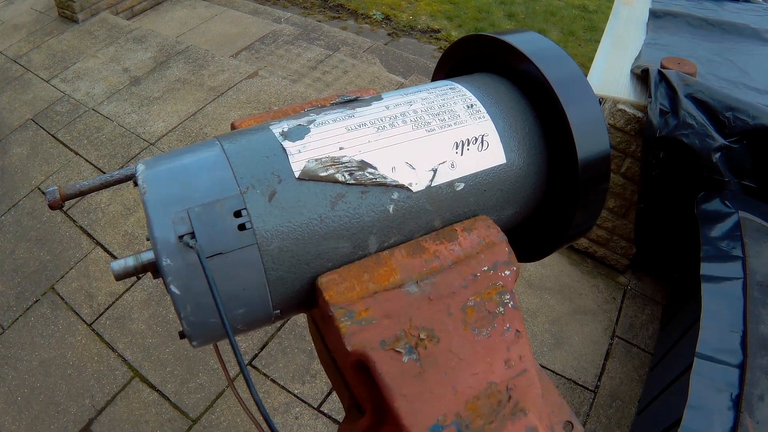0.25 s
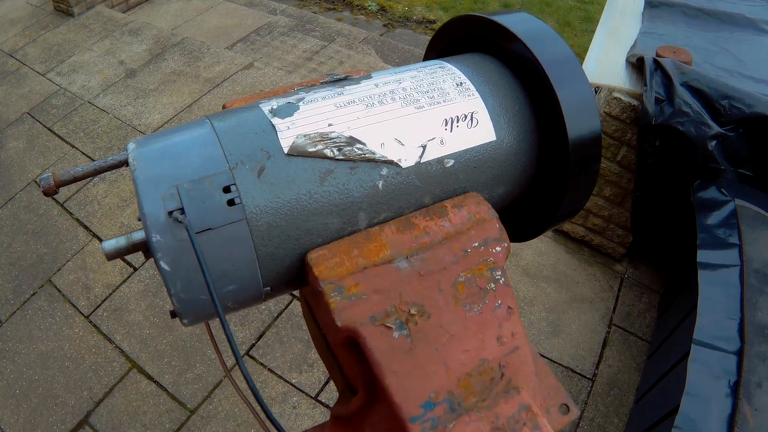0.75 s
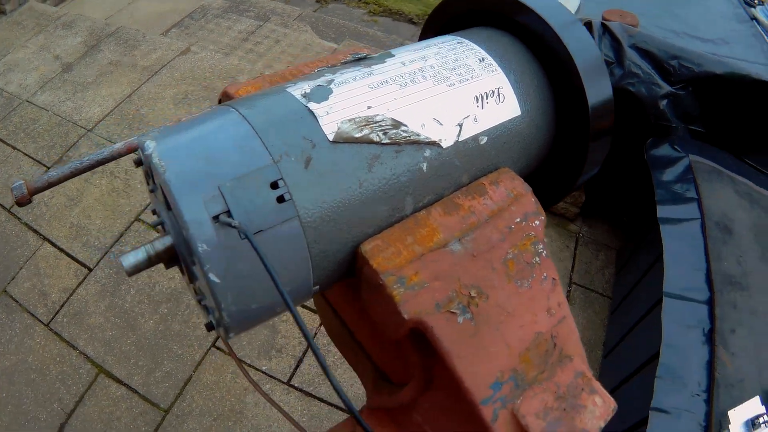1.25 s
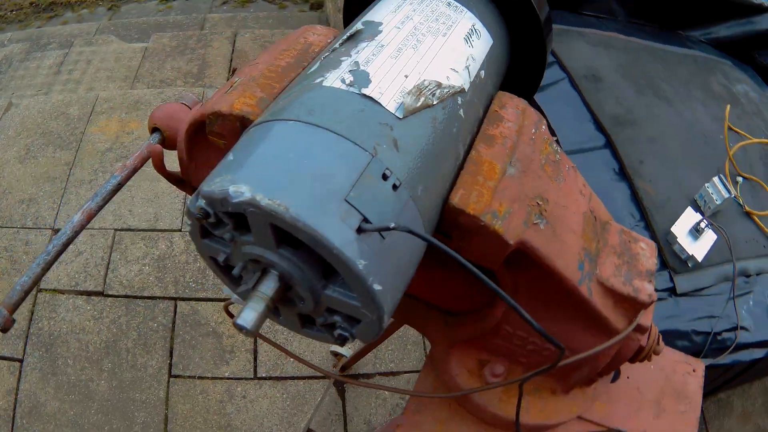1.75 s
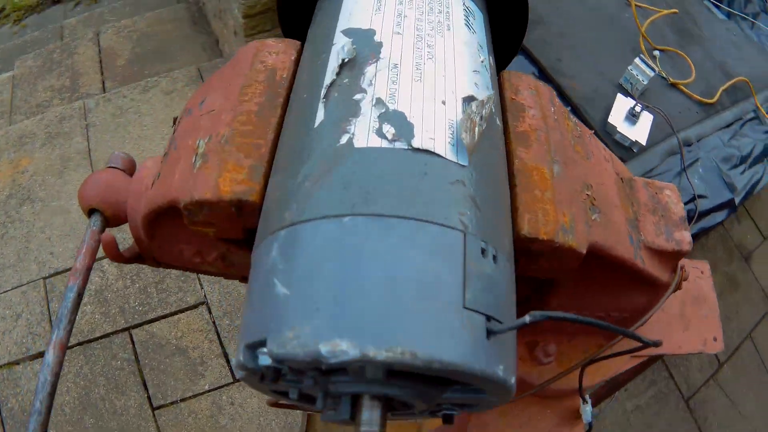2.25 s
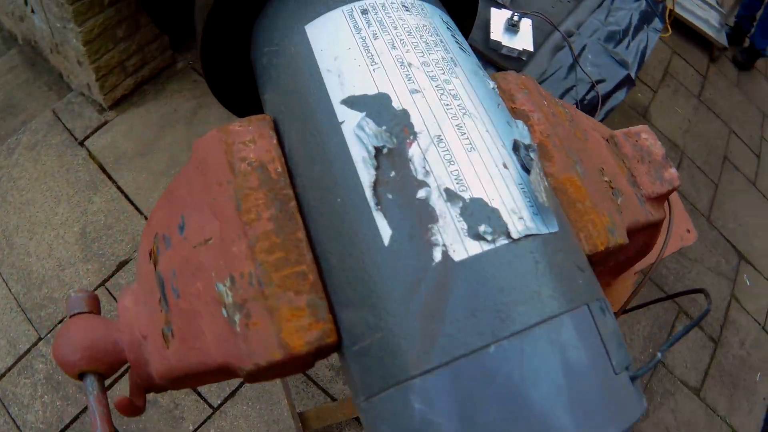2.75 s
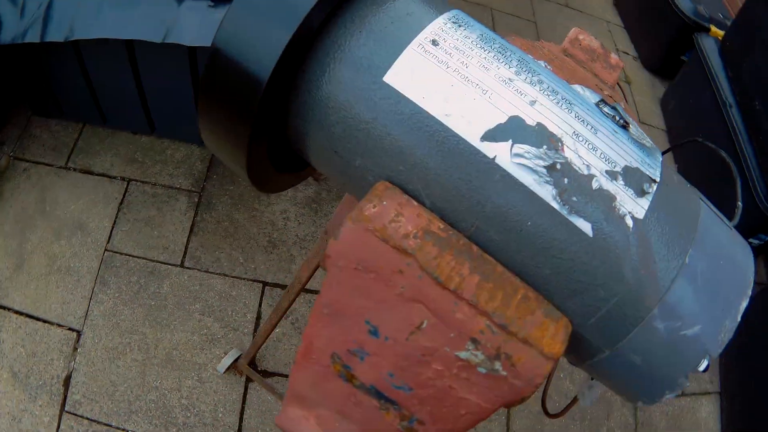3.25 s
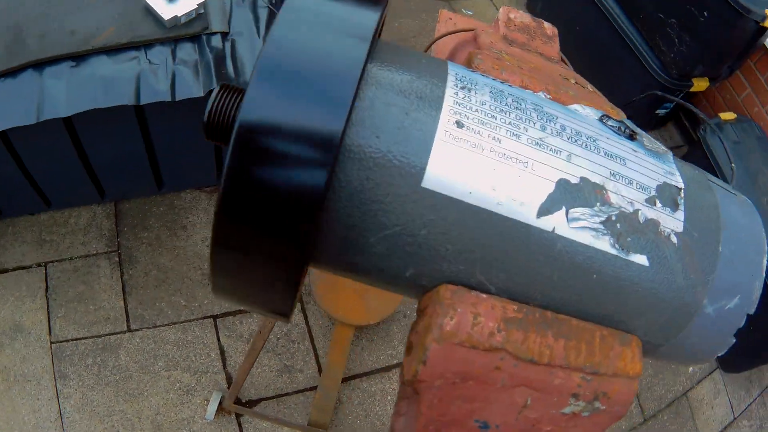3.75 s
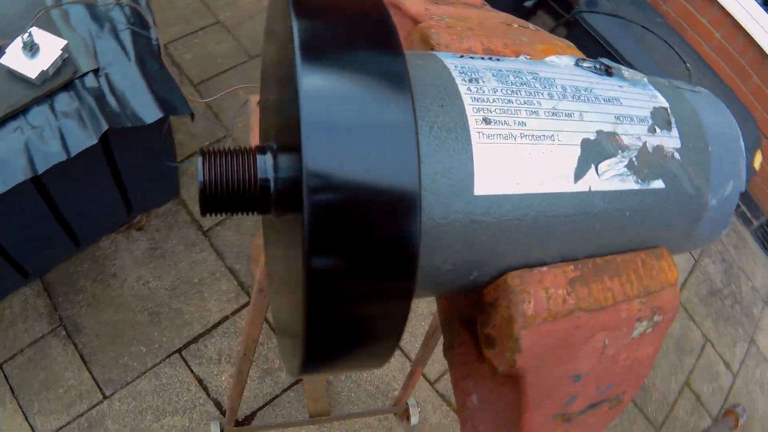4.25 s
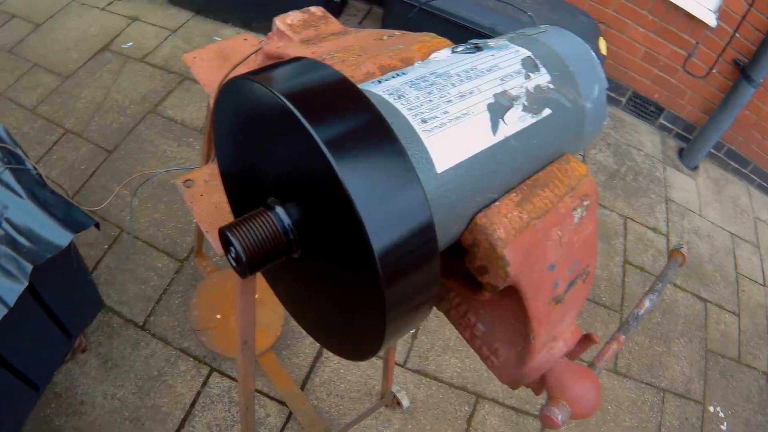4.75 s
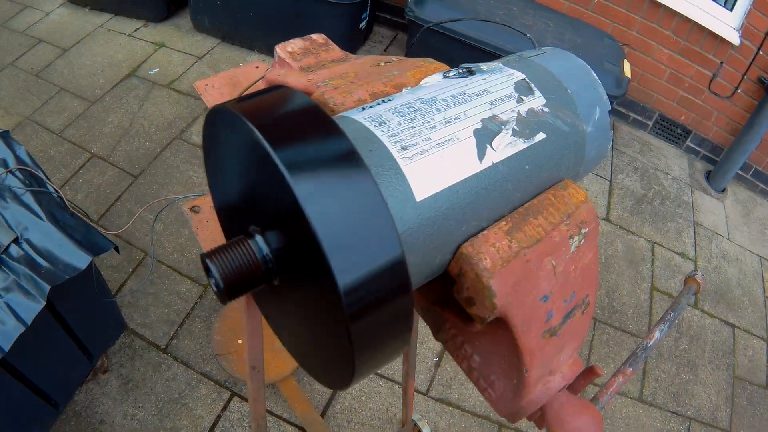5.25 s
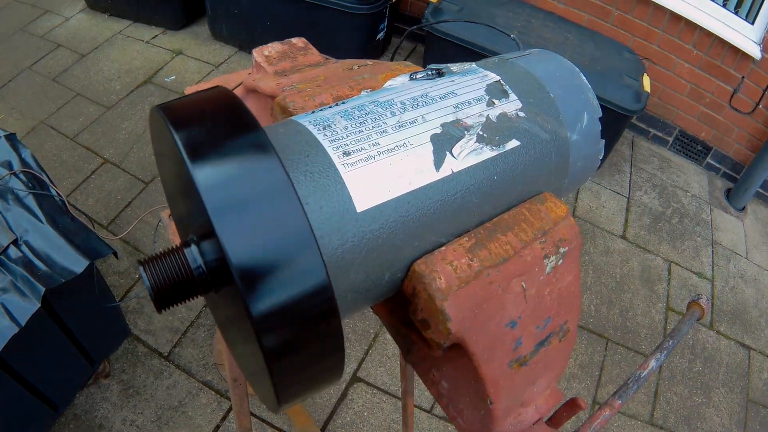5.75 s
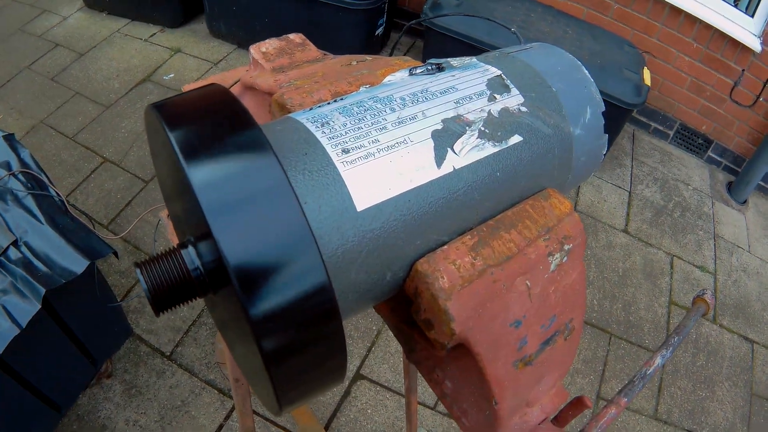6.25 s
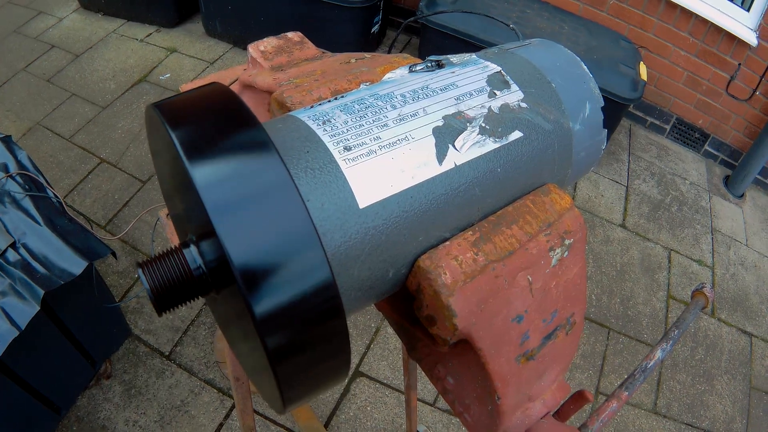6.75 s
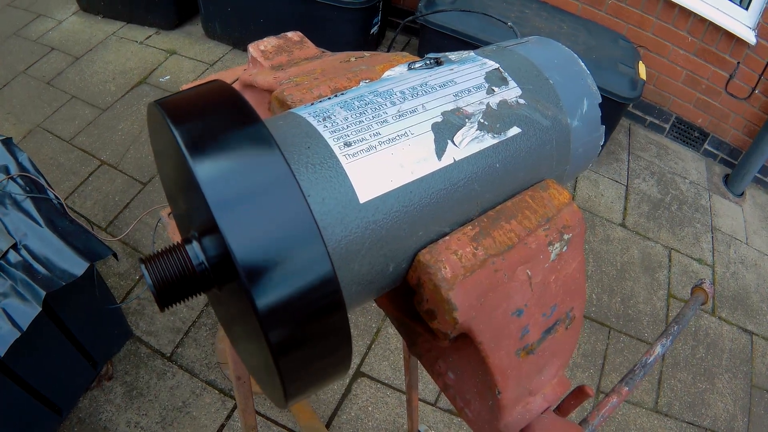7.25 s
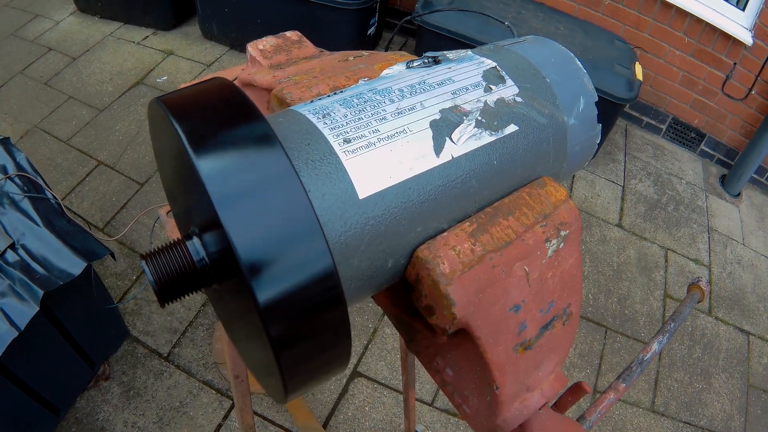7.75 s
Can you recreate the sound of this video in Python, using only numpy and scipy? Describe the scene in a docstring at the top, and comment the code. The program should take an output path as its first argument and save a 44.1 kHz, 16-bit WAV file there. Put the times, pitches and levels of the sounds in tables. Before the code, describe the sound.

An electric motor with a flywheel, clamped in a vice outdoors, is already turning and steadily gathers speed. Its worn bearing gives a throbbing metallic whirr with rising whining tones, while the brushes hiss, whistle thinly and crackle with small sparks. The sound brightens as the microphone passes close over the housing. A short run of dry ticks follows midway, then the whine grows smoother over a building rush of air, with light gusts on the microphone.

```python
"""A DC motor with a flywheel spins up, clamped in a vice outdoors, while the microphone moves round it.
Its worn ball bearing drums on the housing, whose resonances pick out one rising overtone after another.
The flywheel stirs up more and more air; the brushes hiss, whistle and spark on rectified mains.
Midway comes a short run of dry ticks, and gusts of a light breeze buffet the microphone."""
import sys
import numpy as np
from scipy.fft import rfft, irfft, next_fast_len
from scipy.io import wavfile
from scipy.ndimage import map_coordinates

SR = 44100
rng = np.random.default_rng(int(sys.argv[2]) if len(sys.argv) > 2 else 0)


def file_out(sig):
    """Save sig as 16-bit WAV at sys.argv[1]."""
    # one column per channel
    cols = np.atleast_2d(sig).T
    # limit, then scale
    lim = np.clip(cols, -1, 1)
    pcm = np.round(lim * 32767).astype(np.int16)
    wavfile.write(sys.argv[1], SR, pcm)


N = 352800

RIPPLE_HZ = 100  # pulse rate of the rectified mains
LAPS_PER_TURN, LOAD_PEAK_LAPS = .6137, .7  # the shaft laps the ball cage; the load peaks once a lap
# Modes of the steel shell: centre_hz, bandwidth_hz, gain_db
SHELL_MODES = [(590, 87, -47), (900, 140, -17), (1018, 83, -2), (1334, 186, -6), (1860, 273, 2),
               (1982, 90, 7.5), (2052, 87, 0), (2386, 37, 2.5)]


def amp(db):
    """Amplitude ratio of a level in decibels."""
    return 10 ** (np.asarray(db) / 20)


def unit(x):
    """Normalisation to rms 1."""
    return x / np.sqrt(np.mean(x ** 2) + 1e-20)


def curves(rows):
    """Linear interpolation: one value per sample for each column after the time."""
    times, *columns = np.transpose(rows)
    return [np.interp(np.arange(N) / SR, times, column) for column in columns]


def wobble(rate_hz):
    """Random modulation: a smooth curve through rate_hz Gaussian values a second."""
    knots = rng.standard_normal(int(N * rate_hz / SR) + 4)
    return map_coordinates(knots, [np.arange(N) * rate_hz / SR])


def bump(centre_s, width_s):
    """A Gaussian envelope, 1 at its centre."""
    return np.exp(-((np.arange(N) / SR - centre_s) / width_s) ** 2)


def spells(rows, attack_s, release_s):
    """Incoherent sum: the gain of events that rise, hold and decay, adding in power."""
    t, power = np.arange(N) / SR, np.zeros(N)
    for start_s, length_s, level_db in rows:
        rise = np.clip((t - start_s) / attack_s, 0, 1)
        decay = np.exp(-np.maximum(t - start_s - length_s, 0) / release_s)
        power += (amp(level_db) * rise * decay) ** 2
    return np.sqrt(power)


def with_speed(speed, top_db, power):
    """Power law: a gain that grows with shaft speed and reaches top_db at full speed."""
    return amp(top_db) * (speed / speed.max()) ** power


def filtered(x, response):
    """Linear filtering: the spectrum of x times a complex frequency response."""
    size = next_fast_len(N + 8192)
    return irfft(rfft(x, size) * response(np.fft.rfftfreq(size, 1 / SR)), size)[:N]


def coloured(x, spectrum):
    """Spectral shaping by (frequency_hz, gain_db) points, normalised to rms 1."""
    hz, db = np.transpose(spectrum)
    return unit(filtered(x, lambda f: amp(np.interp(np.log(f + 1), np.log(hz), db))))


def ring(x, modes):
    """Modal superposition: x drives damped resonances of alternating polarity."""
    def response(f):
        return sum((-1) ** k * amp(db) * 1j * f * width / (hz * hz - f * f + 1j * f * width)
                   for k, (hz, width, db) in enumerate(modes))
    return filtered(x, response)


def dispersed(x, delay_s=.006, at_hz=3000):
    """Dispersion of bending waves in steel: low frequencies arrive later, so a blow becomes a chirp."""
    return filtered(x, lambda f: np.exp(-4j * np.pi * delay_s * np.sqrt(f * at_hz)))


def periodic(cycles, shape):
    """A periodic wave that repeats shape once a cycle."""
    return np.interp(cycles % 1 * len(shape), np.arange(len(shape) + 1), np.r_[shape, shape[0]])


def blows(cycles, overtones, size=4096):
    """Harmonics in phase add up to one short blow per cycle."""
    harmonic, db = np.transpose(overtones)
    gains = amp(np.interp(np.arange(harmonic[-1]) + 1, harmonic, db))
    return periodic(cycles, irfft(np.r_[0, gains], size) * size / np.sqrt(2))


def rough_track(cycles, harmonics, size=4096):
    """Equal harmonics in random phase form a rough surface profile that returns every cycle."""
    phasors = np.exp(2j * np.pi * rng.random(harmonics))
    return periodic(cycles, unit(irfft(np.r_[0, phasors], size)))


def swelling_tones(rows, turns, waver_db):
    """Partials locked to the shaft rate, each under one wavering Gaussian envelope."""
    t, tones = np.arange(N) / SR, np.zeros(N)
    knots_s = np.arange(0, 9, .06)
    for centre_s, half_width_s, multiple, level_db in rows:
        span = np.abs(t - centre_s) < 2 * half_width_s
        bell = np.exp(-((t[span] - centre_s) / half_width_s) ** 2) - np.exp(-4)  # zero at both ends
        waver = np.interp(t[span], knots_s, rng.standard_normal(len(knots_s)))
        tones[span] += bell * amp(level_db + waver_db * waver) * np.sin(2 * np.pi * multiple * turns[span])
    return np.sqrt(2) * tones


def turn_swell(turns, speed, depth_db=2.0, phase_turns=1.05, lead_s=.0184, settle_turns_per_s=72):
    """Load modulation: once a turn the worn spot bears the flywheel's weight; speed smooths this out."""
    angle = 2 * np.pi * (turns - phase_turns + lead_s * speed)
    unsettled = 1 / (1 + (speed / settle_turns_per_s) ** 20)
    return unit(amp(depth_db * unsettled * (np.cos(angle) + .5 * np.cos(2 * angle))))


def bearing(turns, speed, balls=8, scatter_db=3.5, throb_halved_turns_per_s=49, treble_hz=3250):
    """Impact excitation: balls strike a worn spot on the inner race, and shell and end cap ring."""
    # Strength of the blows, and the shell's gain relative to the end cap: time_s, blow_db, shell_db
    drumming = [(0, -45.5, 3.5), (1.15, -36.5, 0.5), (1.8, -37.5, 3.5), (2.8, -40, 7), (4.1, -40.5, 9),
                (5, -36, -1.5), (8, -41, -26)]
    # Spectrum of the blows, in multiples of the ball-pass rate: harmonic, level_db
    race_overtones = [(1, -20), (3, -25), (4, -10.5), (5, -3.5), (6, -3), (7, -4), (8, -5), (9, -2.5),
                      (10, -2.5), (11, -1), (17, -8), (22, -22.5), (30, -10), (60, 0)]
    # Modes of the end cap that holds the bearing: centre_hz, bandwidth_hz, gain_db
    cap_modes = [(2649, 77, 4), (2867, 166, 3.5), (3048, 127, 2.5), (3975, 160, -13), (4760, 300, -15),
                 (5250, 200, -16.5), (5840, 190, -14), (6900, 2000, -25), (7770, 110, -18)]
    blow_db, shell_db = curves(drumming)
    laps = LAPS_PER_TURN * turns
    throb_depth_db = 2 / (1 + np.exp((speed - throb_halved_turns_per_s) / 3.9))
    throb_db = throb_depth_db * np.cos(2 * np.pi * (laps - LOAD_PEAK_LAPS))
    skid = 0.032 * (wobble(60) + wobble(9))
    impacts = blows(balls * laps + skid, race_overtones) * amp(blow_db + scatter_db * np.tanh(wobble(160)))
    # Rolling noise is part random, part repeated every lap as a comb of fine overtones.
    grit = with_speed(speed, top_db=-27, power=0.39) * rng.standard_normal(N)
    track = with_speed(speed, top_db=-30, power=0.62) * rough_track(laps, harmonics=300)
    force = impacts + grit + track
    # The end cap feels the full throb of the load; the heavy shell feels less.
    cap = ring(dispersed(amp(throb_db) * turn_swell(turns, speed) * force), cap_modes)
    shell = ring(amp(0.7 * throb_db) * force, SHELL_MODES)
    # The microphone picks up more treble as it passes close over the housing.
    treble = filtered(cap, lambda f: 1 - 1 / (1 + (f / treble_hz) ** 20))
    boost_db = 12.5 * bump(centre_s=2.81, width_s=1)
    return cap + (amp(boost_db) - 1) * treble + amp(shell_db) * shell


def whines(turns, speed):
    """Resonance: bearing overtones and the armature's slot whine swell and fade in turn as they rise."""
    # Bearing overtones and slot whine (multiple 16): centre_s, half_width_s, shaft_multiple, level_db
    swells = [(0.02, 0.06, 64.439, -45.5), (0.08, 0.13, 38.663, -46.1), (0.11, 0.17, 73.644, -43.0),
              (0.2, 0.7, 12, -60), (0.14, 0.15, 74.258, -48.0), (0.15, 0.16, 69.348, -40.8),
              (0.17, 0.26, 33.754, -49.0), (0.3, 0.24, 32.367, -41.5), (0.28, 0.24, 36.828, -46.9),
              (0.29, 0.34, 68.121, -45.7), (0.31, 0.34, 68.734, -42.8), (0.32, 0.13, 83.463, -45.6),
              (0.4, 0.26, 48.482, -48.9), (0.48, 0.14, 63.825, -40.0), (0.52, 0.21, 64.439, -42.2),
              (0.57, 0.07, 77.94, -47), (0.58, 0.14, 33.5, -44.3), (0.59, 0.29, 63.211, -43.7),
              (0.72, 0.12, 28.46, -43.0), (0.79, 0.05, 73.03, -47), (0.83, 0.23, 57.288, -43.8),
              (0.84, 0.2, 87.759, -44.7), (0.86, 0.13, 58.915, -40.5), (0.88, 0.13, 58.302, -39.0),
              (0.96, 0.05, 68.121, -46), (0.98, 0.19, 48.1, -44.0), (0.98, 0.24, 82.85, -40.0),
              (0.99, 0.29, 32.0, -50.0), (1.02, 0.23, 54.006, -38.1), (1.05, 0.14, 28.46, -43.2),
              (1.06, 0.24, 53.392, -39.8), (1.13, 0.26, 78.554, -43.0), (1.14, 0.24, 77.94, -38.1),
              (1.15, 0.07, 63.211, -44), (1.18, 0.16, 49.096, -32.4), (1.21, 0.15, 48.1, -39.0),
              (1.25, 0.21, 73.644, -38.4), (1.32, 0.3, 73.03, -39.4), (1.36, 0.07, 58.915, -44),
              (1.4, 0.33, 48.482, -40.4), (1.46, 0.17, 49.096, -34.1), (1.54, 0.17, 44.8, -42.5),
              (1.57, 0.16, 68.734, -38.6), (1.59, 0.17, 68.121, -38.6), (1.62, 0.17, 44.186, -33.4),
              (1.64, 0.17, 54.006, -39.9), (1.65, 0.21, 23.55, -43.3), (1.67, 0.14, 53.392, -41.5),
              (1.84, 0.34, 43.573, -43.1), (1.88, 0.25, 33.367, -46), (1.97, 0.25, 21.71, -46),
              (2.18, 0.25, 32, -43), (2.18, 0.25, 61.46, -42), (1.9, 0.42, 63.825, -41.8),
              (1.92, 0.23, 28.46, -45.4), (1.96, 0.43, 63.211, -35.4), (2.02, 0.28, 58.915, -38.1),
              (2.07, 0.14, 49.096, -37.8), (2.28, 0.57, 58.302, -33.2), (2.31, 0.15, 49.096, -35.7),
              (2.35, 0.14, 57.288, -40.0), (2.35, 0.19, 36.828, -40.3), (2.35, 0.21, 40.92, -36.2),
              (2.44, 0.15, 39.891, -37.3), (2.46, 0.27, 58.915, -37.8), (2.46, 0.31, 39.277, -32.0),
              (2.52, 0.3, 38.663, -37.6), (2.68, 0.59, 54.006, -32.9), (2.71, 0.22, 36.828, -37.2),
              (2.82, 0.41, 53.392, -34.1), (2.82, 0.25, 48, -41), (2.92, 0.23, 34.367, -40.1),
              (3.06, 0.045, 49.096, -29), (3.05, 0.11, 49.096, -29), (3.06, 0.22, 44.186, -36.2),
              (3.08, 0.16, 48.482, -34.5), (3.27, 0.14, 32.736, -34.3), (3.29, 0.24, 34.367, -30.8),
              (3.33, 0.16, 29.458, -40.0), (3.36, 0.29, 33.754, -31.8), (3.46, 0.2, 49.096, -27.5),
              (3.48, 0.21, 48.482, -34.1), (3.65, 0.21, 32.736, -35.5), (3.65, 0.5, 16, -42),
              (3.68, 0.22, 44.8, -37.8), (3.72, 0.23, 44.186, -27.3), (3.75, 0.21, 43.573, -33.9),
              (3.77, 0.25, 40.92, -42), (4.01, 0.17, 49.096, -36.8), (4.16, 0.55, 29.458, -32.0),
              (4.22, 0.26, 44.8, -40.9), (4.23, 0.84, 28.644, -38.2), (4.24, 0.31, 44.186, -29.0),
              (4.28, 0.29, 43.573, -36.0), (4.4, 0.61, 28.844, -42.4), (4.52, 0.3, 40.92, -33.6),
              (4.67, 0.21, 24.548, -39.0), (4.8, 0.3, 33.754, -44), (4.88, 0.68, 39.891, -42.4),
              (4.97, 0.3, 27.85, -38.5), (5.0, 0.4, 32.736, -43), (5.19, 0.85, 39.277, -37.1),
              (5.29, 0.76, 38.663, -39.0), (5.6, 0.9, 16, -41.5), (5.61, 0.27, 24.548, -34.9),
              (5.71, 0.52, 25.55, -38.5), (5.88, 0.49, 25.162, -41.8), (5.93, 0.72, 36.828, -38.1),
              (6.2, 0.2, 24.548, -20.0), (6.37, 0.72, 32.736, -37.9), (6.56, 0.52, 23.934, -39.3),
              (6.83, 0.86, 34.367, -37.4), (7.04, 0.59, 16.0, -35.2), (7.13, 0.58, 23.55, -41.0),
              (7.18, 0.93, 33.754, -39.8), (7.3, 0.47, 24.548, -35.4), (7.55, 0.63, 29.458, -37.2),
              (7.58, 0.58, 32.736, -37.0), (7.65, 0.49, 19.638, -39.1)]
    skidding = np.interp(speed, [62, 78], [1, .45])  # the balls run steadier at high speed
    slip_turns = skidding * (.0008 * wobble(130) + .0006 * wobble(30))
    roughness_db = skidding * wobble(220)
    # Neighbouring overtones beat in step with the load, so they chug.
    turns_since_load = turns - LOAD_PEAK_LAPS / LAPS_PER_TURN + slip_turns
    tones = swelling_tones(swells, turns_since_load, waver_db=1.2)
    return dispersed(amp(roughness_db) * turn_swell(turns, speed) * tones)


def armature(turns, speed, slots=16):
    """Magnetic forcing: slots passing the magnets drive the shell, and the supply ripple hums faintly."""
    # Hum of the windings at the starting current, in multiples of the ripple rate: harmonic, level_db
    hum_partials = [(2, -62.5), (6, -56), (8, -55), (9, -46)]
    strength = with_speed(speed, top_db=-34, power=2.9) * amp(0.58 * wobble(17))
    pull = strength * np.sin(2 * np.pi * slots * turns)
    ripple = RIPPLE_HZ * np.arange(N) / SR
    hum = sum(amp(db + 1.2 * wobble(2.1)) * np.sin(2 * np.pi * (k * ripple + rng.random()))
              for k, db in hum_partials)
    current = speed.min() / speed  # the motor draws less as it gains speed
    return np.sqrt(2) * (ring(pull, SHELL_MODES) + current * hum)


def flywheel(turns, speed, floor_db=-50):
    """Aerodynamic noise: air dragged round the wheel grows steeply with speed; an unbalance drones."""
    # Spectrum of the stirred air: frequency_hz, gain_db
    air_spectrum = [(25, -19), (70, -23.5), (250, -9), (420, -9.5), (540, 0), (620, 2.5), (720, -2.5),
                    (850, 1.5), (950, -1.5), (1200, -4), (1700, -3), (2000, -5.5), (2300, -13),
                    (3300, -16.5), (6000, -45)]
    # Drone of the unbalance at full speed: shaft_multiple, level_db
    unbalance = [(1, -49), (2, -49.5), (3, -55.5)]
    air_gain = np.hypot(with_speed(speed, top_db=-22.5, power=2.495), amp(floor_db))
    air = air_gain * coloured(rng.standard_normal(N), air_spectrum)
    drone = sum(amp(db + 1.5 * wobble(3.29)) * np.sin(2 * np.pi * (k * turns + rng.random()))
                for k, db in unbalance)
    return air + np.sqrt(2) * with_speed(speed, top_db=0, power=3) * drone


def brushes(turns, speed, chirp_hz=7000, chirp_db=-50.5, chirp_fade_turns_per_s=40):
    """Sliding friction: carbon hisses on the commutator and chirps once a turn while the shaft is slow."""
    # Spectrum of the rubbing: frequency_hz, gain_db
    hiss_spectrum = [(1500, -14), (3300, -4), (4000, 0.5), (4800, 0.5), (5500, -7), (7800, -11),
                     (8900, -19.5), (10500, -9.5), (12000, -26.5), (16000, -57)]
    rub = rng.standard_normal(N) * amp(0.27 * np.cos(2 * np.pi * turns) + 0.61 * wobble(200))
    hiss = with_speed(speed, top_db=-35.5, power=1) * coloured(rub, hiss_spectrum)
    high_spot = rng.standard_normal(N) * amp(6 * np.cos(2 * np.pi * (turns - .08)))
    chirp_gain = amp(chirp_db) / (1 + (speed / chirp_fade_turns_per_s) ** 16)
    return hiss + chirp_gain * unit(ring(high_spot, [(chirp_hz, 270, 0)]))


def commutator(turns, gain_db=-0.5, chatter_turns=.0009):
    """Periodic contact: bars ticking under the brushes fuse into thin, fluttering, rising whistles."""
    # Swells of the whistles: centre_s, half_width_s, shaft_multiple, level_db
    whistles = [(.25, .25, 160, -57), (.3, .25, 192, -60), (.68, .18, 144, -53), (1.0, .25, 128, -53),
                (1.2, .25, 144, -57), (1.3, .2, 96, -52), (1.42, .24, 112, -48), (1.75, .2, 160, -54),
                (1.75, .3, 128, -56), (2.0, .4, 96, -55), (2.2, .22, 128, -52), (2.3, .15, 144, -52),
                (2.45, .35, 112, -48), (2.6, .35, 110, -50), (2.7, .24, 96, -46), (2.7, .25, 128, -54),
                (2.7, .35, 80, -49), (2.95, .22, 144, -53), (2.98, .13, 96, -48), (3.0, .25, 112, -52)]
    return amp(gain_db) * swelling_tones(whistles, turns + chatter_turns * wobble(110), waver_db=3.5)


def uneven_bars(turns, far_db=-54, near_db=-41):
    """Periodic roughness: uneven bars pass the two brushes every half turn, giving a harmonic comb."""
    # Spectral envelope of the comb: frequency_hz, gain_db
    comb_spectrum = [(2800, -25), (3700, 0), (4100, 0.5), (5000, 1), (5700, -8), (6500, -7), (7800, -14),
                     (9000, -27)]
    comb = coloured(rough_track(2 * turns, harmonics=110), comb_spectrum)
    nearness = bump(centre_s=2.84, width_s=0.56)  # the microphone passes over the housing
    return (amp(far_db) + amp(near_db) * nearness) * comb


def sparks(spread_db=5, sharpness=5, flicker_db=2.5):
    """Arcing: in flickering bouts the brushes crackle, most strongly at the crests of the ripple."""
    # Bouts of sparking: start_s, length_s, level_db
    bouts = [(.62, 0.9, -53), (1.37, 1.05, -43), (2.0, 0.3, -49), (2.5, 0.97, -45), (3.5, 4.5, -54.5),
             (6.15, 0.22, -45.5)]
    # Spectrum of the small arcs: frequency_hz, gain_db
    crackle_spectrum = [(3000, -2.5), (8800, 0), (10000, 5), (10700, 10), (11800, -9.5), (13000, -4),
                        (14000, -22), (15200, -13)]
    ripple = RIPPLE_HZ * (np.arange(N) / SR - .001)
    crests = np.exp(sharpness * (np.cos(2 * np.pi * ripple) - 1))
    arcs = crests * amp(spread_db * np.tanh(wobble(RIPPLE_HZ)))
    crackle = coloured(rng.standard_normal(N) * (arcs + 0.4), crackle_spectrum)
    return spells(bouts, attack_s=0.066, release_s=0.11) * amp(flicker_db * wobble(30)) * crackle


def snaps(gain_db=-13, fall_30_db_s=.007):
    """Impulsive discharge: now and then a bigger arc jumps and gives one sharp, bright snap."""
    # Single arcs, near crests of the ripple: start_s, level_db
    arcs = [(0.6384, -28), (0.7881, -37), (0.8694, -25), (1.0306, -30.5), (1.0994, -27), (1.1388, -27),
            (1.1887, -20), (1.279, -28), (1.4292, -27), (1.4491, -28), (1.4895, -24), (1.5683, -26),
            (1.6092, -12), (1.6387, -14), (1.6786, -28), (1.7085, -21), (1.7295, -15), (1.7689, -24),
            (1.8193, -16), (1.8497, -24), (1.8908, -11), (1.9305, -26), (2.0103, -26), (2.0198, -19),
            (2.0602, -22), (2.1789, -31), (2.1994, -17), (2.2984, -31)]
    # Spectrum of a snap: frequency_hz, gain_db
    snap_spectrum = [(3000, -14), (7000, -9), (9000, -3), (10600, 4), (11800, -9), (13000, -8),
                     (14200, -14), (15400, -11)]
    t = np.arange(SR // 100) / SR
    envelope = np.zeros(N)
    for start_s, level_db in arcs:
        envelope[round(start_s * SR):][:len(t)] += amp(level_db + gain_db - 30 * t / fall_30_db_s)
    return envelope * coloured(rng.standard_normal(N), snap_spectrum)


def breeze(calm_db=-62, flutter_db=2.0):
    """Turbulent pressure: gusts rise quickly out of a light breeze, buffet the microphone and ebb."""
    # Gusts: start_s, length_s, level_db
    gusts = [(3.08, 0.46, -44), (3.54, 0.069, -39.5), (3.85, 0.58, -43.5), (5.8, 0.95, -45.5),
             (6.81, 0.2, -40.5), (7.35, 0.49, -42.5)]
    # Spectrum of the buffeting: frequency_hz, gain_db
    buffet_spectrum = [(10, -7), (35, -8.5), (70, -6.5), (150, -8), (400, -13.5), (1500, -72)]
    strength = amp(calm_db) + spells(gusts, attack_s=0.016, release_s=0.28)
    return strength * amp(flutter_db * wobble(14)) * coloured(rng.standard_normal(N), buffet_spectrum)


def ticks(gain_db=12, fall_60_db_s=.023):
    """Transient excitation: tiny scrapes set steel ringing in a short run of dry ticks."""
    # Scrapes in the motor: start_s, level_db
    scrapes = [(3.565, -25), (3.632, -22), (3.6988, -20), (3.7646, -20.5), (3.8588, -29), (3.878, -21),
               (3.9123, -19), (3.9745, -22), (3.9906, -26), (4.039, -20.5), (4.101, -18), (4.1642, -21)]
    # Modes of the scraped steel: centre_hz, bandwidth_hz, gain_db
    steel_modes = [(4300, 750, .3), (6950, 600, -4.7), (10050, 650, -5.7)]
    t = np.arange(SR // 50) / SR
    fade_db = gain_db - 60 * t / fall_60_db_s
    force = np.zeros(N)
    for start_s, level_db in scrapes:
        force[round(start_s * SR):][:len(t)] += amp(level_db + fade_db) * rng.standard_normal(len(t))
    return ring(ring(force, steel_modes), steel_modes)  # twice, for narrow pings


def scene():
    """Superposition: one shaft paces all the rotating sources; sparks, ticks and wind add to them."""
    # Spin-up of the shaft: time_s, speed_turns_per_s
    spin_up = [(0.0, 26.35), (0.25, 28.0), (0.5, 29.4), (0.8, 32.91), (1.15, 37.56), (1.5, 41.63),
               (1.75, 44.42), (2.0, 46.28), (2.3, 48.86), (2.55, 50.31), (2.75, 51.73), (3.0, 54.03),
               (3.25, 56.68), (3.5, 59.05), (3.75, 61.09), (4.0, 62.91), (4.25, 65.22), (4.5, 67.6),
               (5.0, 71.71), (5.5, 75.44), (6.0, 78.57), (6.5, 81.31), (7.0, 84.23), (7.5, 86.82),
               (8.0, 89.12)]
    speed, = curves(spin_up)
    turns = np.cumsum(speed) / SR
    motor = bearing(turns, speed) + whines(turns, speed) + armature(turns, speed) + flywheel(turns, speed)
    contacts = brushes(turns, speed) + commutator(turns) + uneven_bars(turns) + sparks() + snaps()
    return (motor + contacts + ticks() + breeze())[None]


def record(dry):
    """Band limiting: an ideal low-pass filter removes the highest treble."""
    cutoff_hz = 15750
    return filtered(dry[0], lambda hz: hz < cutoff_hz)[None]


dry = scene()
out = record(dry)
file_out(out)
```